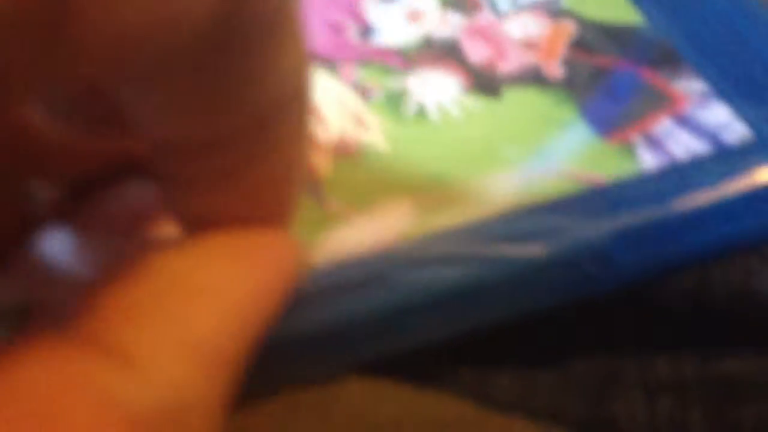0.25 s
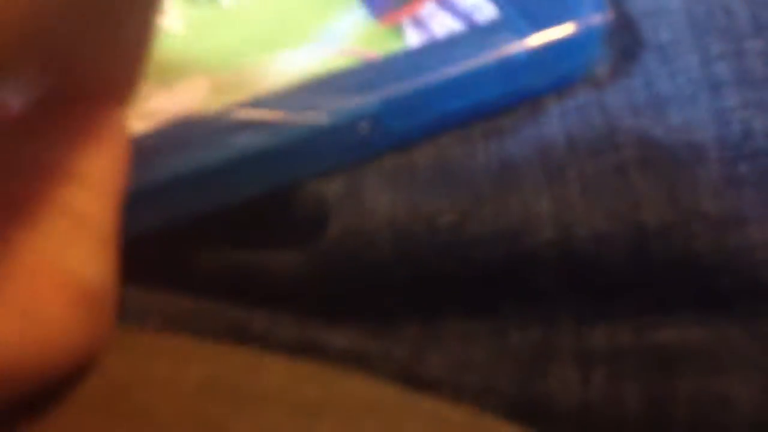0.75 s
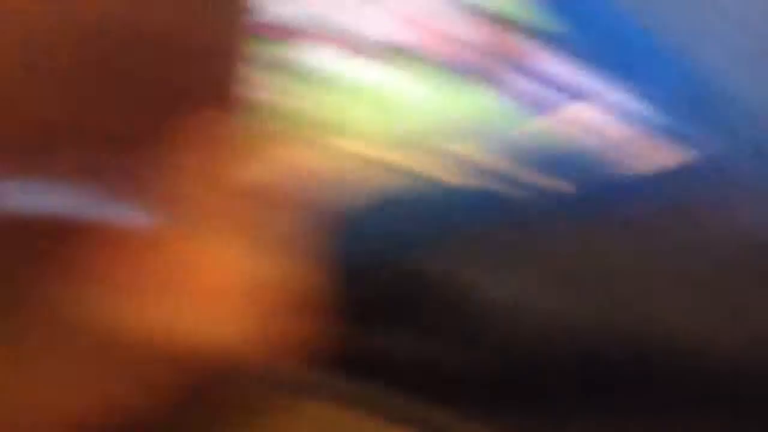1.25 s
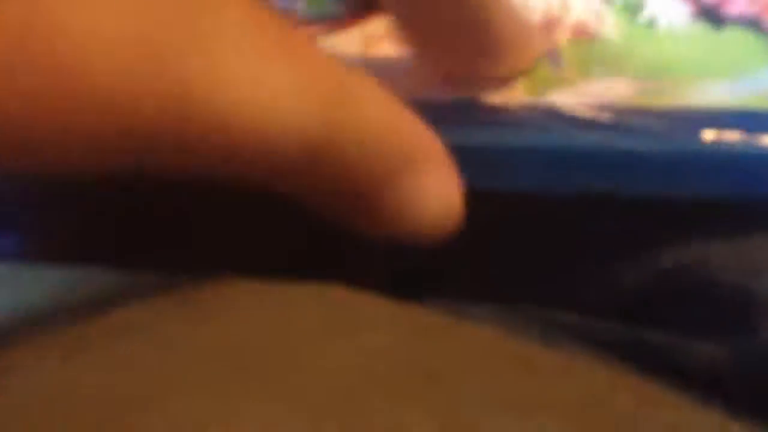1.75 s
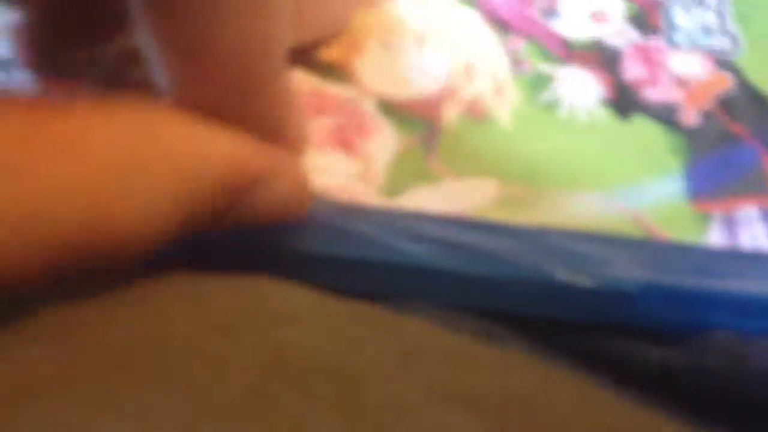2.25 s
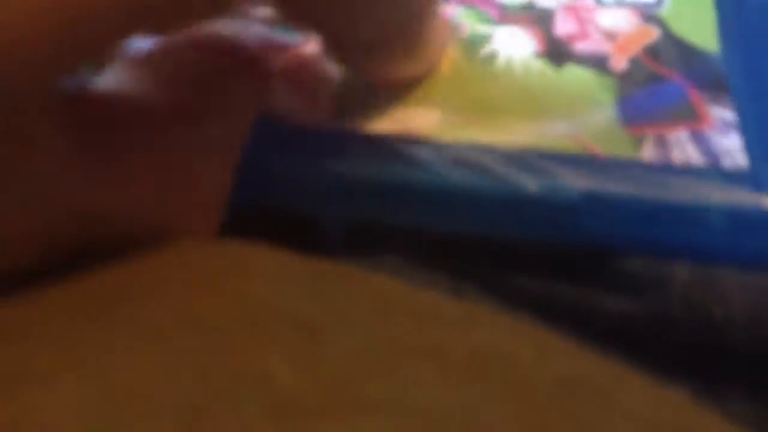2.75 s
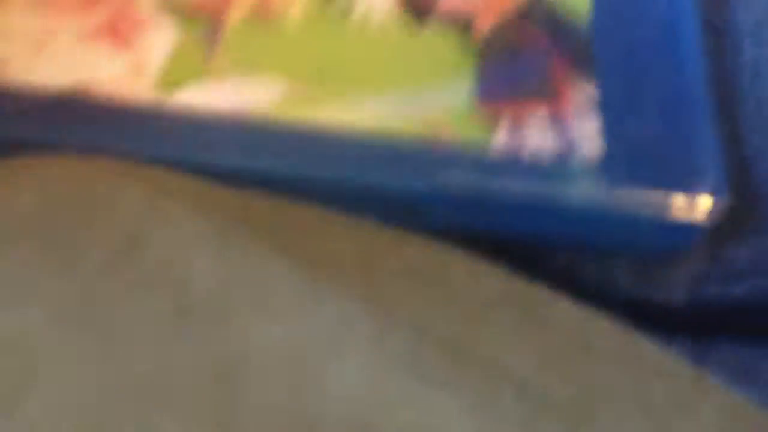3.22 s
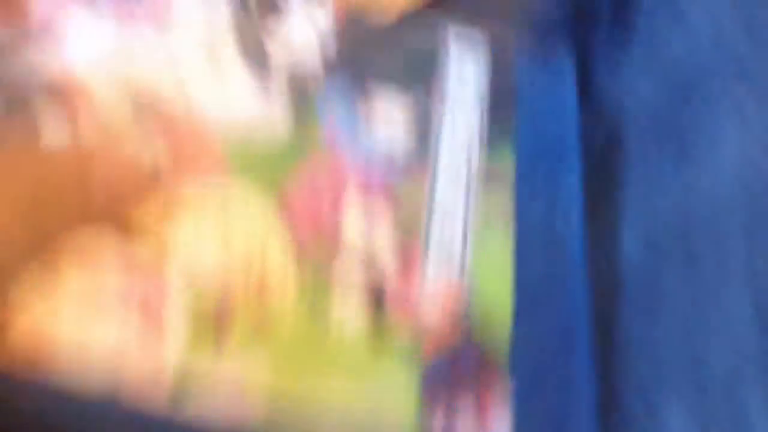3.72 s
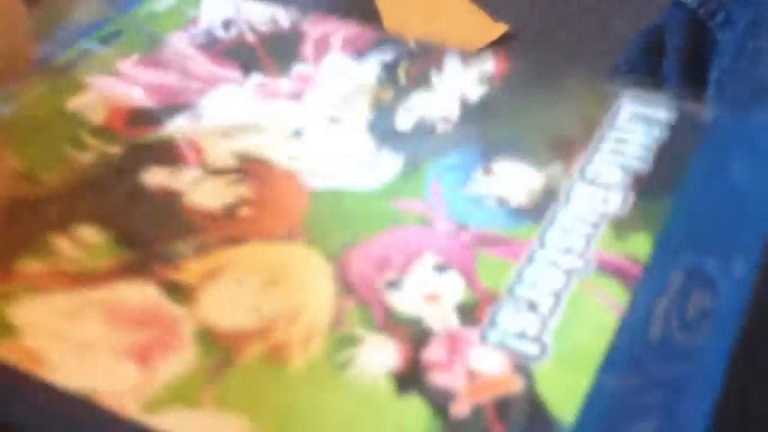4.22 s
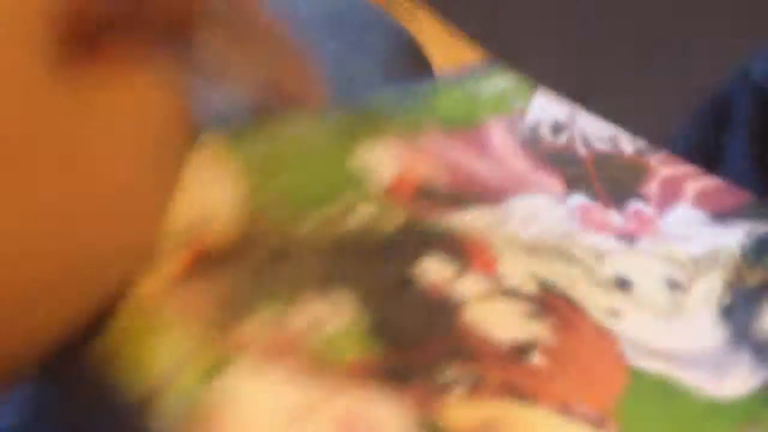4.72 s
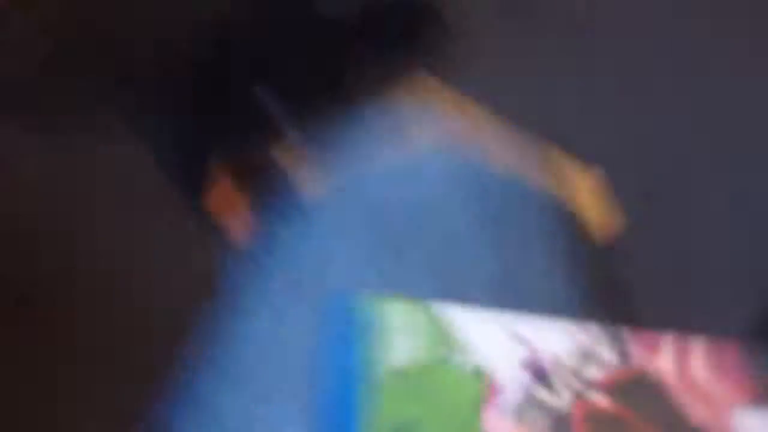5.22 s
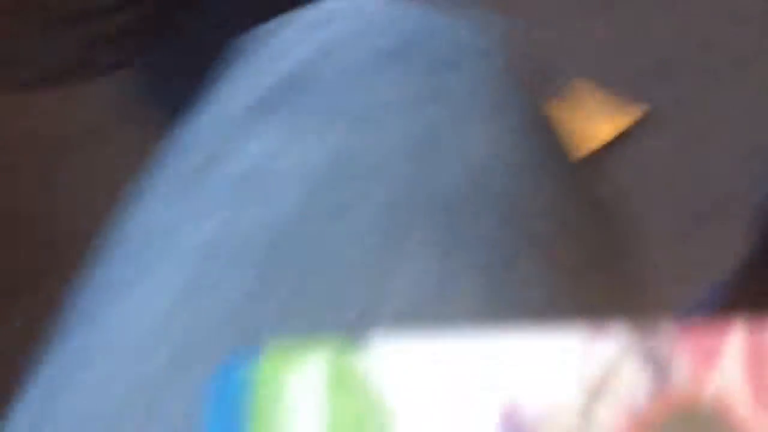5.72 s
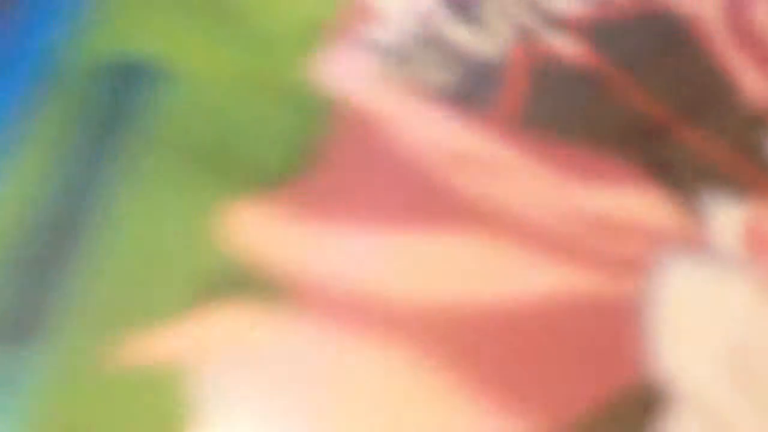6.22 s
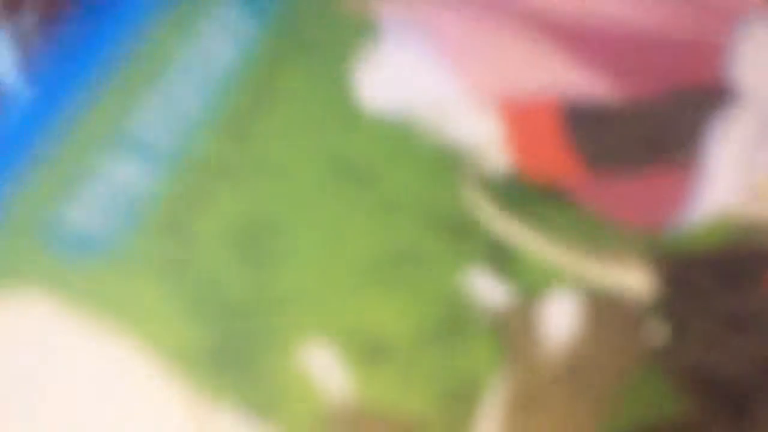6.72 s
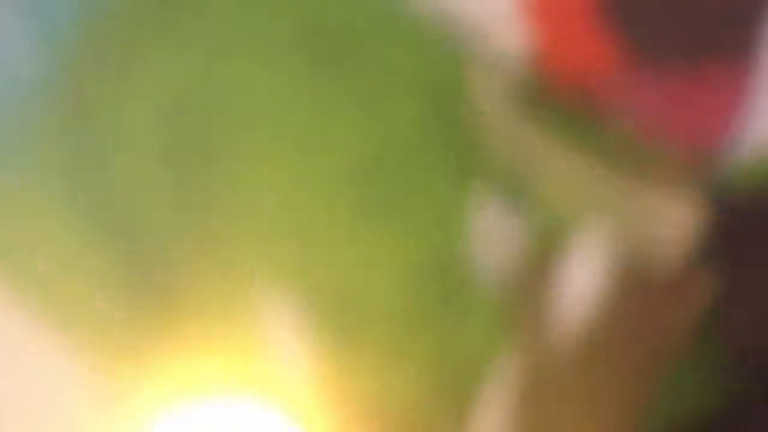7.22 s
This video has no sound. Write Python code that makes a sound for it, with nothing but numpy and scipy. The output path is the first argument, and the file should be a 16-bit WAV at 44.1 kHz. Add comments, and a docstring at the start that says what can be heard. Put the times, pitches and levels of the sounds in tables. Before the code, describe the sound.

Very close, dry indoor handling of thin crisp plastic wrap. Sparse small crackles and occasional bright clicks over faint hiss, then an abrupt microphone bump with a momentary cut to silence. Afterwards tugs come in quick irregular clusters, snapping and crinkling louder, with hollow bumps and lumpy rumble from the case beneath. Late crackle sounds slightly cupped, then eases, with a last strong snap near the end.

```python
"""Tiny crackles patter and creases snap over faint room hiss as fingers pick at, peel and crumple thin shrink film.
The film is on a hollow plastic case close to a small microphone, and the handling grows denser and louder.
Patter is clumped noise puffs, snaps are three-band noise bursts; the case adds band-passed thuds and a lumpy rumble.
Once the microphone itself is knocked and the sound drops out for a moment; late on, balled film colours the crackle."""
import sys
import numpy as np
from scipy import signal
from scipy.fft import rfft, irfft, next_fast_len
from scipy.io import wavfile
from scipy.ndimage import uniform_filter1d

SR = 44100
rng = np.random.default_rng(int(sys.argv[2]) if len(sys.argv) > 2 else 0)


def wav_record(signal):
    """Record a signal, one row per channel, as 16-bit PCM in the file named by sys.argv[1]."""
    frames = np.transpose(np.atleast_2d(signal))
    bounded = np.clip(frames, -1, 1)
    # unit amplitude maps onto the largest positive 16-bit level
    quanta = np.round(bounded * 32767).astype(np.int16)
    wavfile.write(sys.argv[1], SR, quanta)


N = 329427


def from_db(db):
    """Amplitude ratio of a level in dB."""
    return 10 ** (np.asarray(db) / 20)


def rms_one(x):
    """Scales x to rms 1."""
    return x / np.sqrt(np.mean(x ** 2) + 1e-20)


def seconds():
    """Time of every sample."""
    return np.arange(N) / SR


def coloured(x, spectrum):
    """Shapes x by a (frequency, density) table, linear in dB over log frequency; rms 1."""
    size = next_fast_len(N)
    bin_hz = np.maximum(np.arange(size // 2 + 1) * SR / size, 1)
    table_hz, table_db = np.transpose(spectrum)
    gain = from_db(np.interp(np.log(bin_hz), np.log(table_hz), table_db))
    return rms_one(irfft(rfft(x, size) * gain, size)[:N])


def drift(rate_hz):
    """Slow random wander of rms 1: noise through two equal one-pole low-passes."""
    pole = np.exp(-2 * np.pi * rate_hz / SR)
    noise = rng.standard_normal(N + SR)
    return rms_one(signal.lfilter([1], [1, -2 * pole, pole * pole], noise)[SR:])   # settled part only


def resonance(x, hz, width_hz):
    """Rings one peak of unit gain."""
    return signal.lfilter(*signal.iirpeak(hz, hz / width_hz, fs=SR), x)


def band_pass(x, order, low_hz, high_hz):
    """Butterworth band-pass."""
    return signal.sosfilt(signal.butter(order, [low_hz, high_hz], "band", fs=SR, output="sos"), x)


def add(out, start_s, burst):
    """Mixes a burst in at start_s."""
    at = round(start_s * SR)
    out[at:at + len(burst)] += burst[:N - at]


# tugs and squeezes of the film: (full strength from [s], swell time of the last 20 dB [s], hold [s],
# film patter level [dB], case grip rumble level [dB]); swells under 2 ms count as 2 ms
TUGS = [(0, .04, 0.036, -57, -73), (0.26, 0.16, 0.33, -63, -64), (0.855, 0.7, 0.046, -61, -67.5),
        (1.043, -0.06, 0.019, -62, -63.5), (1.313, -0.22, 0.12, -54.5, -60),
        (1.428, -0.02, 0.063, -52.5, -46), (1.589, 0, 0.01, -61, -54), (1.863, .07, 0.038, -46.5, -47),
        (2.187, 1.8, 0.055, -65, -64), (2.645, 0.03, 0.068, -60, -64), (2.965, 0.02, 0.014, -34.5, -41),
        (3.014, -0.05, 0.058, -42, -48), (3.292, -0.02, 0.069, -45, -56), (3.394, -0.8, 0.019, -45.5, -72),
        (3.606, .04, .06, -45, -54), (3.5, .01, .02, -57, -68), (3.743, -0.24, .07, -42, -54),
        (4.018, -0.5, .12, -44, -57.5), (4.18, 2, 0.089, -48, -57), (4.424, .01, 0.052, -37, -54),
        (4.52, 0.7, .03, -55, -72), (4.67, .008, .08, -51, -58), (4.801, -0.11, 0.043, -37.5, -48),
        (4.949, 0, .04, -36, -58), (5, .03, .05, -42, -60), (5.139, 0.2, .04, -44, -46.5),
        (5.211, 0.04, 0.054, -32.5, -43.5), (5.37, 0.1344, 0.021, -39, -38.5),
        (5.456, -0.03, 0.015, -25.5, -30), (5.5, .01, .03, -29, -28), (5.56, .03, .08, -37, -45),
        (5.701, 0.14, 0.13, -33, -42), (5.922, -0.06, .13, -32, -43), (6.169, -0.04, 0.041, -30, -46.5),
        (6.313, -0.75, 0.071, -34, -53), (6.53, .05, 0.088, -27.5, -40), (6.66, .02, .02, -42, -56),
        (6.705, .02, .065, -33, -47), (6.8, .01, .06, -40, -55), (6.897, 1.2, 0.047, -49.5, -58),
        (7.01, -0.06, 0.045, -48.5, -52.5), (7.14, 2.5, 0.19, -57, -60.5), (7.413, 0.15, .07, -56, -55.5)]
# film stirring in the hands between tugs: (time [s], patter level [dB])
STIR = [(0, -71), (2.85, -74), (3.3, -63), (3.86, -68), (4.0, -51), (4.5, -59), (4.6, -74), (4.655, -74),
        (4.7, -55), (5.3, -41.5), (6.3, -55), (6.8, -57), (7.47, -61)]
STIR_GRIP_DB = -20.5   # rumble against patter
RELEASE_DB_PER_S = 380


def effort():
    """Each tug swells, holds and dies away linearly in dB; the loudest rules, never below the stirring."""
    t = np.arange(0, N + 64, 64) / SR   # coarse grid, interpolated below
    start_s, swell_s, hold_s, patter_db, grip_db = np.transpose(TUGS)[:, :, None]
    rise_db = -20 * np.maximum(start_s - t, 0) / np.maximum(swell_s, .002)
    shape_db = rise_db - RELEASE_DB_PER_S * np.maximum(t - start_s - hold_s, 0)
    stir_db = np.interp(seconds(), *np.transpose(STIR))

    def loudest(tug_db, rest_db):
        tugs_db = np.interp(seconds(), t, (tug_db + shape_db).max(axis=0))
        return np.maximum(tugs_db, rest_db)

    return loudest(patter_db, stir_db), loudest(grip_db, stir_db + STIR_GRIP_DB)


# colour of crackle and skin slide on film: (frequency [Hz], relative density [dB per Hz])
FILM = [(500, -8.5), (1200, -1.5), (2500, 1.5), (5000, 6.5), (9000, 6), (14000, 2.5), (16000, 3.5)]
CREASES_PER_S, CLUMP_DB, CLUMP_HZ = 1100, 3.0, 30
PUFF_T60_S, SLIDE_DB = 0.0066, -18.0   # slide against puffs


def patter(level_db):
    """Small creases give way in clumps as noise puffs coloured by fold size, over smooth skin slide."""
    born = rng.random(N) < CREASES_PER_S * from_db(CLUMP_DB * drift(CLUMP_HZ)) / SR
    sizes = from_db(3.2 * np.minimum(rng.exponential(1, N), 4))
    fade = from_db(-60 / (PUFF_T60_S * SR))
    folds = rng.integers(0, 6, N)
    puffs = 0
    for k, hz in enumerate(np.geomspace(1800, 13000, 6)):
        envelope = signal.lfilter([1], [1, -fade], born * sizes * (folds == k))
        puff = envelope * rng.standard_normal(N)
        ring = resonance(puff, hz, hz / 1.3)
        puffs = puffs + 1.15 * puff + 2 * np.sqrt(6000 / hz) * ring
    slide = from_db(SLIDE_DB) * rng.standard_normal(N)
    return from_db(level_db) * coloured(rms_one(puffs) + slide, FILM)


# rumble colour of the case: (frequency [Hz], relative density [dB per Hz])
CASE = [(60, -4), (170, -2), (350, -3), (800, 5.5), (1600, -6.5), (3500, -33)]
LUMP_DB, LUMP_HZ = 5.6, 37


def grip(level_db):
    """The case creaks and rumbles under the hands: low noise in random lumps."""
    lumps = from_db(LUMP_DB * drift(LUMP_HZ))
    return from_db(level_db) * coloured(lumps * rng.standard_normal(N), CASE)


# colour of air and hiss: (frequency [Hz], relative density [dB per Hz])
ROOM_TONE = [(40, -0.5), (130, -6.5), (300, -5.5), (520, -7), (700, -6), (1100, -11), (2400, -19.5),
             (3500, -16.5), (9000, -24.5), (15000, -21.5)]
ROOM_TONE_DB = -66.5
# faint drones: (frequency [Hz], width [Hz], rms level [dB])
ROOM_HUM = [(355, 25, -76), (470, 30, -74)]


def room_tone():
    """Steady coloured noise plus two wavering drones of noise through narrow resonances."""
    out = from_db(ROOM_TONE_DB) * coloured(rng.standard_normal(N), ROOM_TONE)
    for hz, width_hz, level_db in ROOM_HUM:
        out += from_db(level_db) * rms_one(resonance(rng.standard_normal(N), hz, width_hz))
    return out


SNAP_RISE_S, BURST_SAMPLES = 0.00035, 500
SNAP_LEAD_S = 4 * SNAP_RISE_S   # creep before the buckling


def fold_bursts(count, low_hz, high_hz, t60_s):
    """Per snap a crease creeps, buckles and shakes many film modes, one standing out; each burst peaks at 1."""
    t = np.arange(BURST_SAMPLES) / SR - SNAP_LEAD_S
    ring_spread = from_db(rng.normal(0, 2.8, (count, 1)))   # some folds ring longer
    creep = np.exp(2.02 * t / SNAP_RISE_S)
    decay = from_db(-60 * t / (t60_s * ring_spread))
    pitch, phase = rng.random((2, count, 1))
    mode_hz = low_hz * (high_hz / low_hz) ** pitch
    mode = np.sin(2 * np.pi * (mode_hz * t + phase))   # start phase stays within one radian-turn
    noise = rng.standard_normal((count, BURST_SAMPLES))
    shake = (noise + .35 * mode) * np.where(t < 0, creep, decay)
    band = band_pass(shake, 3, low_hz, high_hz)
    return band / np.abs(band).max(axis=1, keepdims=True)


# clear snaps of creases: (peak time [s], peak of the middle folds [dB], brightness of fine over broad folds [dB])
SNAPS = [(0.03, -42.5, -11), (0.0993, -46.5, -3), (0.2628, -40, 10), (0.3396, -31, 13), (0.6156, -41, 16),
         (0.7036, -41.5, 7), (0.8126, -36, 16), (0.8605, -32.5, 30), (1.046, -36.5, 6), (1.0523, -12, 23.5),
         (1.1507, -40.5, 5), (1.2565, -49, -6), (1.283, -46, -14), (1.2919, -39.5, -10), (1.3047, -40, 2),
         (1.3212, -26, 5), (1.362, -30, 7), (1.4144, -27, 14), (1.4266, -19, 11), (1.447, -17, 9),
         (1.4577, -10.5, 17.5), (1.766, -37, 1), (1.8518, -33.5, 5), (1.8778, -34, -15), (1.8949, -25.5, 4),
         (1.9018, -21, 20), (2.0175, -49, 15), (2.096, -40, 3), (2.1597, -46, -12), (2.2159, -29, 17),
         (2.5837, -38, 5), (2.6288, -36.5, -6), (2.6592, -30, 1), (2.684, -35.5, -15), (2.7988, -46, -22),
         (3.0461, -26, 15), (3.0827, -27, 19), (3.1216, -39, 18), (3.1509, -37.5, 11), (3.21, -29, 5),
         (3.2188, -36, 5), (3.2272, -37, 5), (3.2945, -27, -2), (3.3186, -17.5, 11), (3.346, -22, 13),
         (3.3612, -26, -2.5), (3.3664, -25, 11), (3.3995, -29.5, 0.5), (3.4074, -21.5, 1.5),
         (3.4148, -31, -13), (3.4926, -26, 8), (3.4988, -35, -4), (3.5873, -27.5, 19), (3.6096, -25, 9),
         (3.6312, -21, 19), (3.6424, -23, 35.5), (3.7532, -17, 6), (3.7998, -23, 11), (3.8763, -49, -6),
         (3.9205, -26.5, 2), (3.949, -33, -2), (4.0077, -24, 2), (4.0811, -24.5, 1), (4.0895, -15.5, 8),
         (4.174, -32, 16), (4.193, -31, 0), (4.26, -34, 0), (4.2815, -23.5, 1), (4.3396, -29, -6),
         (4.347, -28.5, 6), (4.367, -29, 1), (4.416, -19, -11), (4.419, -18.5, 10), (4.4373, -11, -10),
         (4.4435, -11.5, 7), (4.4532, -9, -3), (4.4707, -21, 2), (4.5104, -16, 7.5), (4.519, -27, 3),
         (4.5571, -25.5, -9), (4.5655, -32, -1), (4.576, -28, 10), (4.663, -43, -26), (4.6683, -19.5, -3.5),
         (4.7218, -15, 24), (4.7502, -20, -8), (4.7597, -23, -8), (4.7868, -29.5, -1), (4.8059, -9, 5),
         (4.8255, -17.5, -9), (4.8869, -19, 16), (4.935, -23, -7), (4.9502, -15, 14), (5.0791, -32, 11),
         (5.093, -25, 5), (5.1267, -20, -8), (5.1728, -22, -9), (5.2159, -18, 1), (5.2348, -13, 20),
         (5.2532, -12.5, 11), (5.2696, -13.5, 6), (5.3315, -15, 0), (5.352, -17, -5), (5.376, -15, -7),
         (5.3906, -11.5, -6), (5.405, -11.5, 5), (5.4214, -14, 6), (5.4532, -2.5, 1), (5.4636, -4, -13),
         (5.4744, -18, 4), (5.4926, -10, 14), (5.4996, -6.5, -20), (5.5059, -2, 1), (5.54, -13.5, 14),
         (5.566, -18, -11), (5.58, -12, -8), (5.598, -7.5, -4), (5.6284, -14, -4), (5.6351, -12.5, -15),
         (5.6428, -18, -8), (5.6594, -26, 10), (5.679, -13.5, 8), (5.699, -10.5, -2), (5.756, -2.5, 8.5),
         (5.7599, -5, 6), (5.7672, -8, 1), (5.8498, -16, 17), (5.8559, -24, 14), (5.8647, -13, -12),
         (5.9319, -14, 14), (6.0032, -16, 8), (6.0116, -16, 11), (6.023, -7.5, 12), (6.0414, -8.5, -5.5),
         (6.056, -12, 14), (6.0662, -10.5, 24), (6.095, -16.5, 15), (6.1151, -17, 10), (6.1409, -9.5, 2.5),
         (6.1666, -10, 11), (6.1758, -8.5, 10), (6.183, -6, 8), (6.2051, -8.5, 0), (6.2315, -22, 11),
         (6.2394, -23, 15), (6.261, -32, 10), (6.2702, -21.5, 0), (6.2918, -20, 9), (6.3024, -20, 20),
         (6.315, -14, 22), (6.3207, -23, 5), (6.3294, -22, 2), (6.3429, -11, -9), (6.354, -13.5, -15),
         (6.364, -16, 4), (6.3877, -15.5, -3), (6.4354, -14, 11), (6.4512, -31, 15), (6.4936, -14, 17),
         (6.5, -25, 19), (6.5195, -13.5, 1), (6.5261, -18, 7), (6.5376, -12, 26), (6.5551, -9.5, -13.5),
         (6.6029, -7, -12), (6.6165, -11.5, -11), (6.6239, -11, 1), (6.638, -19, 3), (6.6797, -20, 4),
         (6.7028, -23, 7), (6.7114, -11.5, 0), (6.7947, -29, -6), (6.8183, -21.5, -11), (6.9157, -32, -9),
         (6.9249, -23, 17), (6.94, -20, 1), (6.9858, -32, 15.5), (7.016, -35.5, -2), (7.028, -32, 12),
         (7.043, -24.5, 24), (7.058, -30.5, 20), (7.0764, -19.5, 4), (7.0905, -34, 12), (7.119, -23.5, 17),
         (7.1539, -24, 7), (7.1958, -32, 8), (7.2093, -26, 8), (7.213, -19.5, 13), (7.2367, -34, -1),
         (7.266, -26, 0), (7.281, -36.5, -15), (7.3033, -25.5, 17), (7.3169, -33, -15), (7.3231, -27.5, -7),
         (7.361, -27.5, -4), (7.3797, -28, 17), (7.393, -12, 7), (7.406, -33, 9), (7.4259, -6.5, 13),
         (7.4386, -20, 7)]
BROAD_DB, FINE_DB = -6, -6   # against the middle folds, at brightness 0


def snaps():
    """Each snap blends broad, middle and fine folds; broad ones ring longest."""
    peak_s, peak_db, bright_db = np.transpose(SNAPS)[:, :, None]
    count = len(peak_s)
    broad = fold_bursts(count, 1390, 5800, 0.0092) * from_db(BROAD_DB - bright_db / 2)
    middle = fold_bursts(count, 4020, 9700, 0.0066)
    fine = fold_bursts(count, 6900, 14870, 0.004) * from_db(FINE_DB + bright_db / 2)
    bursts = from_db(peak_db) * (broad + middle + fine)
    out = np.zeros(N)
    for at_s, burst in zip(peak_s[:, 0], bursts):
        add(out, at_s - SNAP_LEAD_S, burst)
    return out


ROOM_T60_S, WALL_CUT_HZ, ROOM_DB = 0.19, 8000, -23


def room(x):
    """Diffuse tail: low-passed dying noise that fades in with the first walls."""
    t = np.arange(round(.4 * SR)) / SR
    onset = np.clip(t / 0.0051, 0, 1)
    tail = rng.standard_normal(len(t)) * from_db(-60 * t / ROOM_T60_S) * onset
    tail = signal.lfilter(*signal.butter(1, WALL_CUT_HZ, fs=SR), tail)
    return from_db(ROOM_DB) * signal.fftconvolve(x, tail / np.sqrt(np.sum(tail ** 2)))[:N]


# fingertip sliding over taut film: (start [s], end [s], level [dB])
STROKE = (0.26, 0.63, -59)
STROKE_EDGE_S = .05


def stroke():
    """Smooth hiss of skin on film: steady film-coloured noise with soft ends."""
    start_s, end_s, level_db = STROKE
    t = seconds()
    touch = np.clip(np.minimum(t - start_s, end_s - t) / STROKE_EDGE_S + .5, 0, 1)
    return from_db(level_db) * touch * coloured(rng.standard_normal(N), FILM)


# fingers bumping the hollow case: (peak time [s], peak level [dB], centre frequency [Hz])
THUDS = [(0.266, -40.5, 690), (0.327, -34.5, 484), (0.341, -40, 540), (1.363, -33, 634),
         (1.383, -32.5, 580), (1.461, -29, 560), (1.509, -40, 600), (1.586, -42.5, 320), (1.88, -26, 900),
         (2.004, -45, 432), (2.633, -40.5, 650), (2.659, -44.5, 526), (2.757, -36, 670),
         (3.079, -29.5, 640), (3.32, -37.5, 730), (3.406, -40.5, 627), (3.493, -43.5, 713),
         (3.517, -44, 208), (3.724, -43, 567), (3.753, -37.5, 467), (3.949, -56, 630), (4.023, -40, 643),
         (4.093, -34, 506), (4.339, -37.5, 820), (4.418, -30.5, 790), (4.562, -47, 413),
         (4.669, -33.5, 577), (4.747, -37.5, 478), (5.129, -20, 624), (5.404, -18.5, 705),
         (5.508, -13.5, 430), (5.629, -23.5, 435), (5.705, -21, 376), (5.76, -13, 404), (5.813, -27.5, 308),
         (5.828, -23, 520), (6.184, -22.5, 730), (6.318, -37, 462), (6.341, -28, 480), (6.505, -31, 337),
         (6.555, -25, 640), (6.809, -30, 318), (7.018, -40, 744), (7.043, -40, 684), (7.079, -43, 640),
         (7.174, -36.5, 640), (7.318, -40, 810), (7.392, -30, 820), (7.428, -38, 383)]


def thuds():
    """A soft fingertip push, a short swell of noise, shakes the case wall over a wide band."""
    out = np.zeros(N)
    t = np.arange(1800) / SR
    swell = t / .003 * np.exp(-t / 0.0018)
    pushes = rng.standard_normal((len(THUDS), 1800)) * swell
    for (peak_s, peak_db, hz), push in zip(THUDS, pushes):
        wall = band_pass(push, 2, hz / 2.46, hz * 1.92)
        add(out, peak_s - .005, from_db(peak_db) * wall / np.abs(wall).max())
    return out


# knock on the microphone and its rebound: (time [s], signed height, push length [s],
# crack level before smoothing [dB])
KNOCKS = [(2.94205, -1.25, .00065, -7), (2.9660, .8, .00016, -13)]


def knocks():
    """Blows on the microphone body: a one-sided half-sine pressure push with a brief noise crack."""
    out = np.zeros(N)
    t = np.arange(200) / SR
    for at_s, height, length_s, crack_db in KNOCKS:
        add(out, at_s, height * np.sin(np.pi * np.clip(t / length_s, 0, 1)))
        crack = uniform_filter1d(rng.standard_normal(200), size=2)   # the housing dulls the very top
        add(out, at_s - .0002, from_db(crack_db - 60 * t / .003) * crack)
    return out


# silence after the knock: (start [s], end [s])
DROPOUT_S = (2.9455, 2.9655)


def drop_out(x):
    """Mutes x in place between the knock and its rebound."""
    start_s, end_s = DROPOUT_S
    x[round(start_s * SR):round(end_s * SR)] = 0
    return x


# air pocket cupped by balled-up film: (start [s], end [s], frequency [Hz], width [Hz], boost [dB])
POCKET = (6.51, 7.6, 2680, 630, 9)


def cupped(film):
    """Adds the ring of the air pocket to the crackle while it is held."""
    start_s, end_s, hz, width_hz, boost_db = POCKET
    t = seconds()
    held = (t > start_s) & (t < end_s)
    return film + (from_db(boost_db) - 1) * resonance(film * held, hz, width_hz)


def scene():
    """Film and case in the room, with the dropout and the knocks."""
    patter_db, grip_db = effort()
    film = cupped(snaps() + patter(patter_db)) + stroke()
    close = film + thuds() + grip(grip_db)
    air = drop_out(close + room(close) + room_tone())
    return (air + knocks())[None]


# microphone port peak and dip: (frequency [Hz], width [Hz], gain [dB])
PORT = [(4900, 730, 2), (5230, 1420, -7)]
MIC_LOW_HZ, MIC_LOW_Q = 165, 1.6
OVERLOAD = .95   # ceiling of the rounded peaks
TOP_SHELF_HZ, CUTOFF_HZ = 15000, 16500


def record(dry):
    """A resonant bass cut that rings after knocks, port colour, rounded peaks, a weak top, a steep cut-off."""
    w = 2 * np.pi * MIC_LOW_HZ
    x = signal.lfilter(*signal.bilinear([1, 0, 0], [1, w / MIC_LOW_Q, w * w], SR), dry)
    for hz, width_hz, gain_db in PORT:
        x = x + (from_db(gain_db) - 1) * resonance(x, hz, width_hz)
    x = OVERLOAD * np.tanh(x / OVERLOAD)
    x = signal.sosfilt(signal.ellip(4, 1, 18, TOP_SHELF_HZ, fs=SR, output="sos"), x)
    return signal.sosfilt(signal.ellip(12, 1, 85, CUTOFF_HZ, fs=SR, output="sos"), x)


dry = scene()
out = record(dry)
wav_record(out)
```